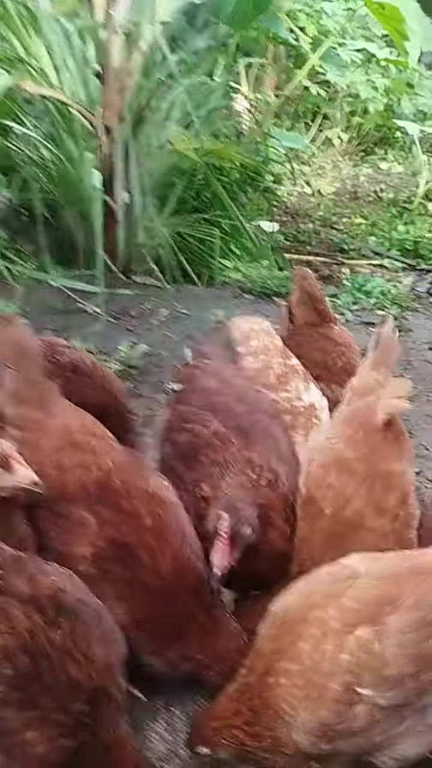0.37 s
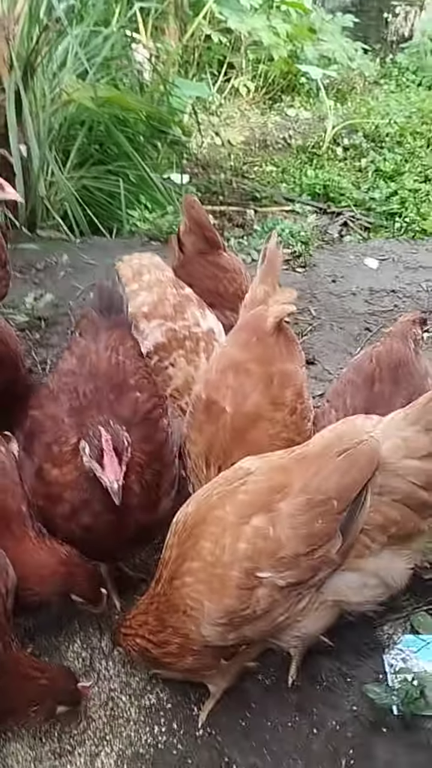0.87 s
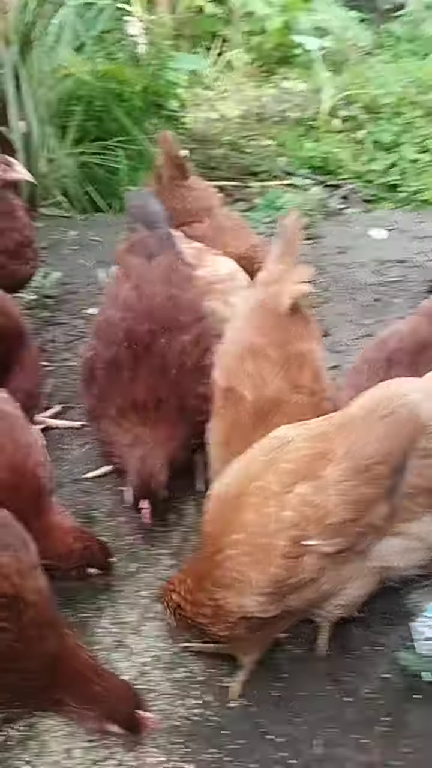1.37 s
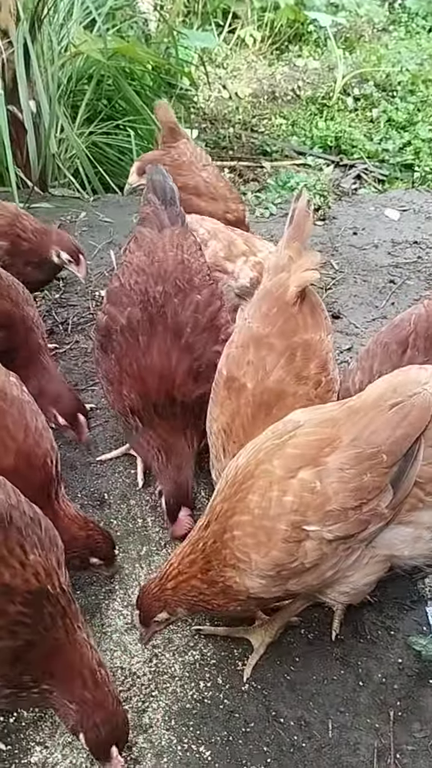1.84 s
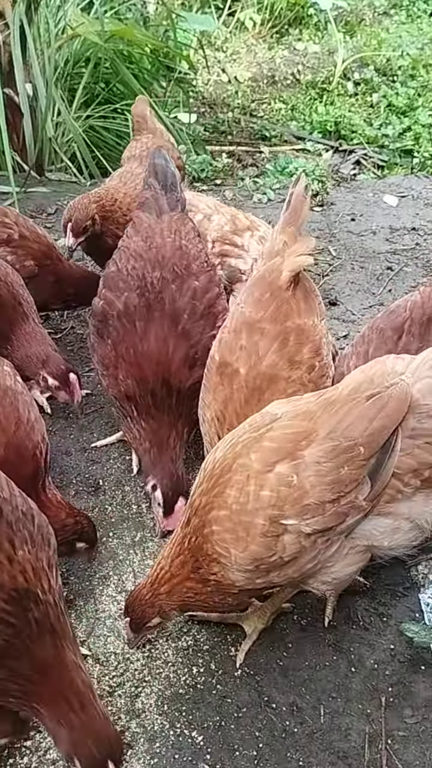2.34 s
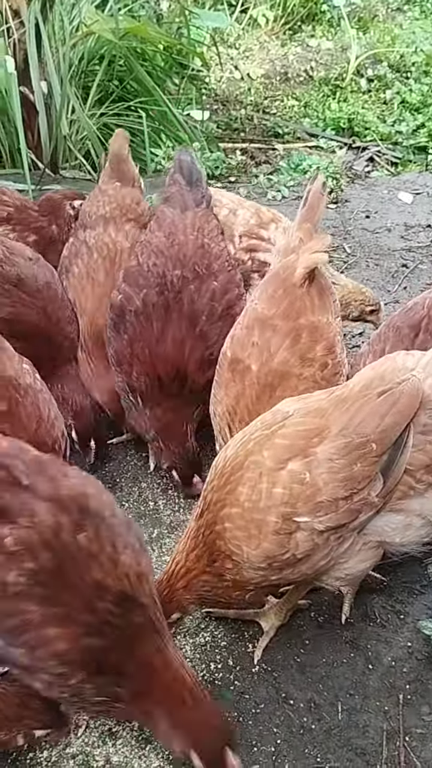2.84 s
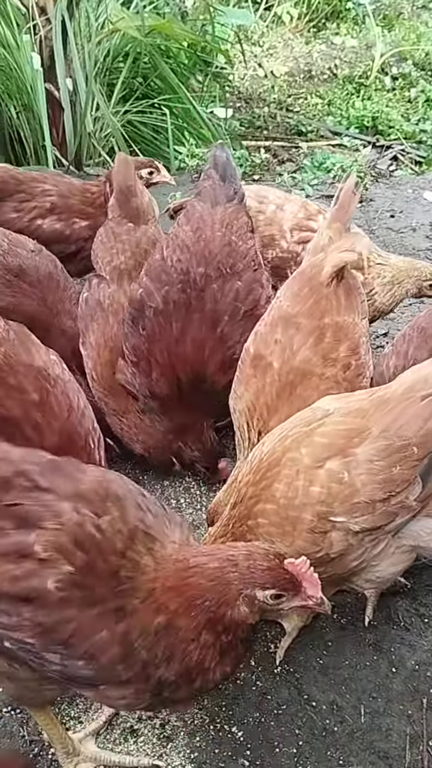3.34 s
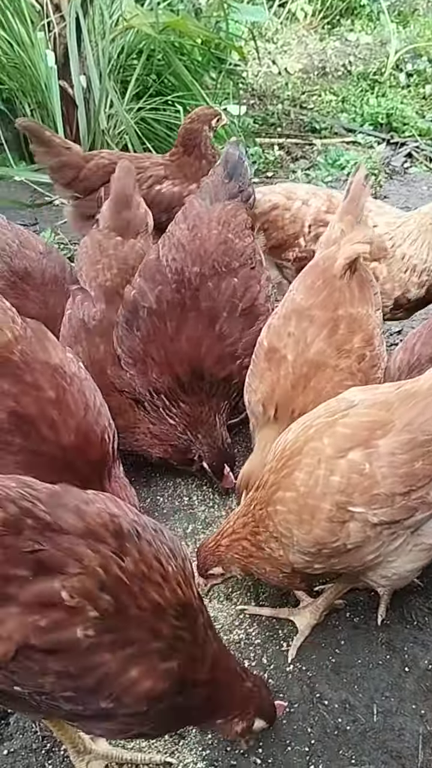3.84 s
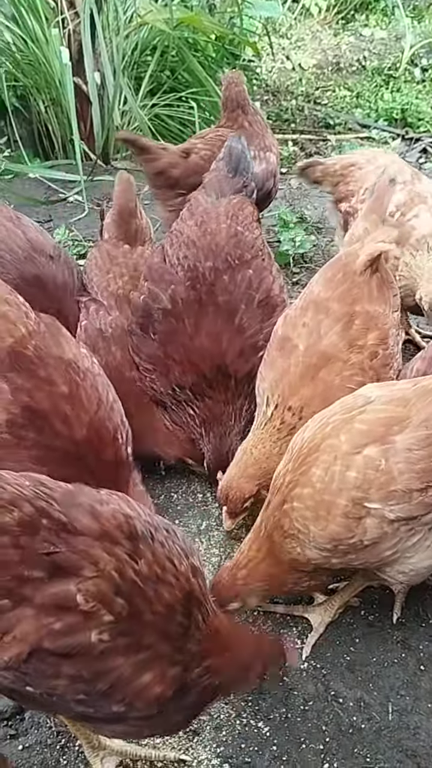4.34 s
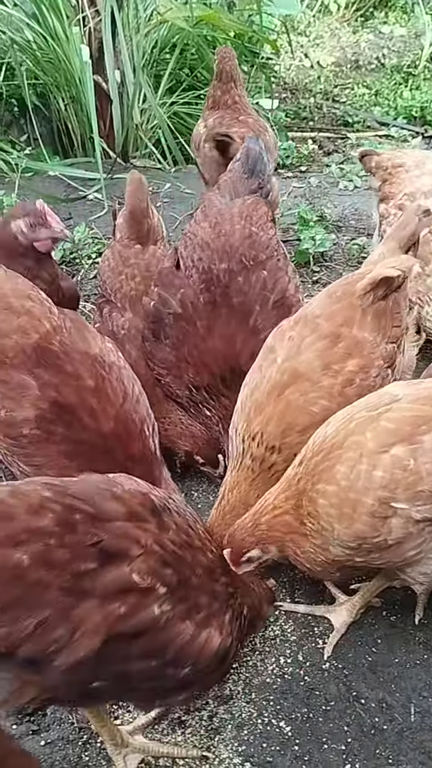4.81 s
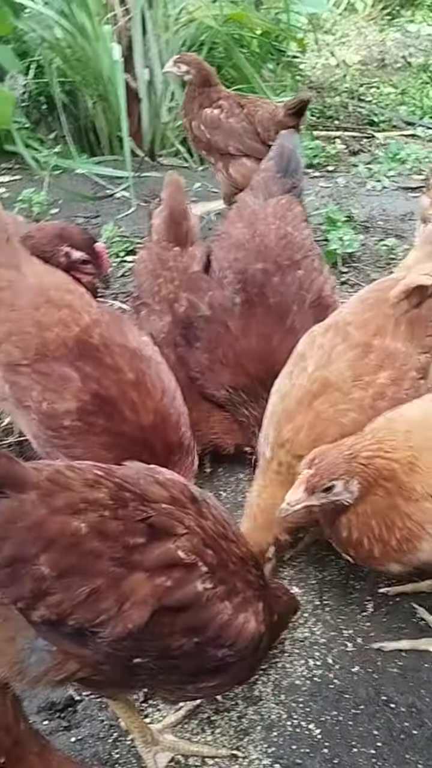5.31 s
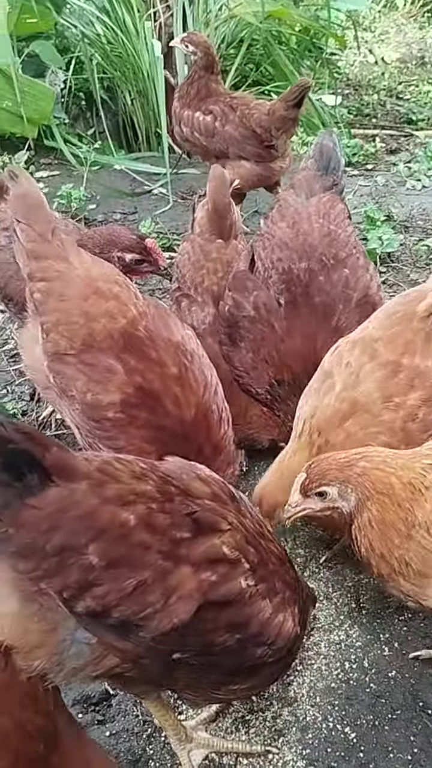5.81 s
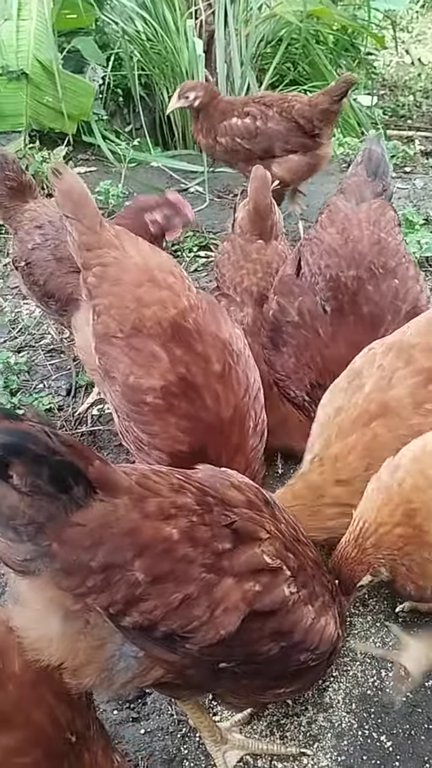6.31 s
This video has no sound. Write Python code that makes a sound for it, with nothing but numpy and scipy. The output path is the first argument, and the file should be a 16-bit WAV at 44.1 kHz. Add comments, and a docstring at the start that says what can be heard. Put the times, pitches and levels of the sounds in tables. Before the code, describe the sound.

Outdoors, quick high peeps gliding downwards and lower, rounder clucks come from several hens around a handheld stereo phone. They are sparse at first, then cluster densely in the middle and continue loosely to the end. Beaks tick and thud softly on the ground, and feet rasp through grain, most clearly near the end. Behind them lie a deep engine drone, soft yard noise, faint insects and a distant trilling bird.

```python
"""A yard, with young hens close by: they peep and cluck over scattered feed, scratching and pecking.
Far off a small bird trills and a hen calls; insects hiss and distant engines drone below.
Calls are gliding tones with overtones, scratches and pecks are filtered noise, the bird whistles sines,
the engines are wavering low tones and the yard is coloured noise. A handheld stereo phone listens."""
import sys
import numpy as np
from scipy import signal
from scipy.fft import rfft, irfft
from scipy.io import wavfile
from scipy.ndimage import map_coordinates

SR = 44100
rng = np.random.default_rng(int(sys.argv[2]) if len(sys.argv) > 2 else 0)


def wav_out(sig):
    """Save sig, one row per channel (or a flat mono array), as 16-bit PCM at SR to the path in sys.argv[1]."""
    wavfile.write(sys.argv[1], SR, np.round(np.clip(np.atleast_2d(sig).T, -1, 1) * 32767).astype(np.int16))


def boost(x):
    """Linear amplitude factor 10**(x/20) for a level x in decibels (scalar or array-like)."""
    u = np.asarray(x, float) / 20
    return 10 ** u


N = 294147   # length in samples


def rms_one(x):
    """Scale to rms 1."""
    return x / np.sqrt(np.mean(x ** 2) + 1e-20)


def drift(rate, count):
    """Slow noise of spread about 1 that changes about rate times a second."""
    knots = rng.standard_normal(int(count * rate / SR) + 3)
    return map_coordinates(knots, [np.arange(count) * rate / SR], order=3)


def band(x, hz, octaves):
    """Band-pass around hz."""
    edges = [hz * 2 ** (-octaves / 2), min(hz * 2 ** (octaves / 2), .45 * SR)]
    return signal.sosfilt(signal.butter(2, edges, "band", fs=SR, output="sos"), x)


def add(out, s, sound, pan_db):
    """Place a mono sound at time s, louder and a little earlier on one side (positive pan: left)."""
    for side, sign in enumerate([1, -1]):
        at = max(int(s * SR - 0.37 * sign * pan_db), 0)
        piece = sound[:N - at]
        out[side, at:at + len(piece)] += piece * boost(sign * pan_db / 2)


# Distant engine drones, one list per drone: t/s, f/Hz, level/dB (relative)
DRONE_TRACKS = [
    [(0., 65.2, -37.5), (1.4, 65.88, -32.5), (1.75, 68.5, -42), (2.2, 70.35, -43.5), (2.5, 75.47, -34),
     (2.9, 78, -40), (4.4, 73.3, -39.5), (6.3, 82, -41)],
    [(2., 111.5, -44.5), (2.7, 111.8, -39.5), (4.3, 108.7, -48)],
    [(3.9, 56.38, -42.5), (4.37, 57.92, -37), (5.2, 37.23, -42), (5.7, 53.06, -45.5), (6.67, 56.9, -35.5)],
]


def engines():
    """Distant engines: wavering low tones, each with a weak octave, that fade in and out with distance."""
    out, t = np.zeros(N), np.arange(N) / SR
    for rows in DRONE_TRACKS:
        s, hz, db = np.transpose(rows)
        wavering_hz = np.interp(t, s, hz) * (1 + 0.01028 * drift(7, N))
        phase = 2 * np.pi * np.cumsum(wavering_hz) / SR
        # fades of 0.55 s lie outside the first and last points
        fade = np.clip(np.minimum(t - s[0], s[-1] - t) / 0.55 + 1, 0, 1)
        level = boost(np.interp(t, s, db) + 4 + 1.67 * drift(8.2, N))
        out += fade * level * (np.sin(phase) + boost(-17.0) * np.sin(2 * phase))
    return out


YARD_DB = -40   # rms level of the whole background
# Spectrum of traffic, leaves and insects around the microphone: f/Hz, level/dB (per Hz, relative)
YARD_SPECTRUM = [(18, -26), (30, -2.5), (81, -5), (210, -16), (330, -18.5), (385, -26.5), (800, -32.5),
                 (1280, -39.5), (2410, -41), (3490, -47.5), (6300, -47.5), (6800, -44.5), (7800, -40.5),
                 (10300, -46), (12000, -56.5), (16000, -59.5)]
# Where the background sits between the channels: f/Hz, level/dB (left over right)
YARD_LEAN = [(100, -2.5), (4400, -3), (7200, 0)]


def yard(patchy_db=1.24):
    """Coloured noise, alike in both channels in the bass and unrelated in the treble, wavering by band."""
    hz = np.maximum(np.arange(N // 2 + 1) * SR / N, 1)
    points, lean = np.array(YARD_SPECTRUM), np.array(YARD_LEAN)
    colour = boost(np.interp(np.log(hz), np.log(points[:, 0]), points[:, 1]))
    alike = 1 / (1 + (hz / 560) ** 2.33)
    mid, side = rfft(rng.standard_normal((2, N))) * colour
    both = np.sqrt(1 + alike) * mid + np.sqrt(1 - alike) * side * [[1], [-1]]
    lean_db = np.interp(np.log(hz), np.log(lean[:, 0]), lean[:, 1])
    both = both * boost(lean_db * [[.5], [-.5]])
    octave = np.log2(hz / 30).astype(int)
    out = sum(irfft(both * (octave == k), N) * boost(patchy_db * drift(5, N)) for k in range(-1, 10))
    return boost(YARD_DB) * rms_one(out)


def cricket():
    """One insect: a very narrow band of noise, pulsed 33 times a second, that slowly swells and sinks."""
    t = np.arange(N) / SR
    pulses = np.maximum(np.sin(2 * np.pi * 33 * t), 0) ** 2
    line = rms_one(band(rng.standard_normal((2, N)), 6855, 0.019))
    return boost(-72.0 + 2.0 * drift(1.6, N)) * pulses * line


# Trills of a small bird far off, onset of the first whistle: t/s
TRILL_STARTS = [.75, 0.999, 1.229, 1.46, 3.31, 3.53, 3.779, 4, 4.709, 4.949]


def far_bird():
    """Five quick falling whistles a trill, blurred by leaves on the way."""
    out, t = np.zeros((2, N)), np.arange(int(0.0239 * SR)) / SR
    for s in TRILL_STARTS:
        for k in range(5):
            hz = np.linspace(5650, 4350, len(t)) * rng.normal(1, .04)
            whistle = np.hanning(len(t)) * np.sin(2 * np.pi * np.cumsum(hz) / SR)
            add(out, s + 0.034 * k, boost(rng.normal(-59.5, 0.86)) * whistle, 5.)
    tail = np.arange(SR // 8) / SR
    blur = rng.standard_normal((2, len(tail))) * boost(-27 - 60 * tail / 0.2)
    return boost(-9) * out + signal.fftconvolve(out, blur, axes=1)[:, :N]


# Calls of a hen far off: start t/s, length t/s, level/dB (relative)
FAR_HEN_CALLS = [(0., 0.23, -58), (0.333, 0.28, -63), (1.839, 0.21, -60.5)]


def far_hen():
    """A drawn-out croak: three wavering partials, over a rasp."""
    out = np.zeros((2, N))
    for s, length, db in FAR_HEN_CALLS:
        count = int(length * SR)
        phase = 2 * np.pi * np.cumsum(597 * (1 + .035 * drift(90, count))) / SR
        tone = sum(boost(level_db + 4.9 * drift(37, count)) * np.sin(k * phase)
                   for k, level_db in enumerate([0., -6., 1.], 1))
        rasp = rms_one(band(rng.standard_normal(count), 1200, 1.3))
        tone = tone * (1 + .5 * drift(250, count)) + rasp
        add(out, s, boost(db) * np.hanning(count) ** .5 * tone, 0)
    return out


# Feet scratching through feed: middle t/s, half-length t/s, centre f/Hz, level/dB (at the swell's top)
FOOT_STROKES = [(0.749, 0.049, 5350, -55), (1.365, 0.32, 6500, -65.5), (1.794, 0.15, 6700, -61.5),
                (2.055, 0.052, 6520, -65.5), (2.099, 0.048, 4900, -61), (2.26, 0.12, 6730, -64.5),
                (3.176, 0.08, 5530, -51.5), (5.991, 0.049, 5800, -43.5), (6.24, 0.058, 5134, -57),
                (6.515, 0.2, 5770, -58)]


def scratches():
    """Dense grain clicks under a swelling stroke, with a faint high rasp."""
    out = np.zeros((2, N))
    for s, half_length, hz, db in FOOT_STROKES:
        count = int(2 * half_length * SR)
        grains = rng.standard_normal(count) * boost(3.0 * np.minimum(rng.exponential(1, count), 4))
        body = rms_one(band(band(grains, hz, .5), hz, .5))
        rasp = boost(-18) * rms_one(band(grains, 13500, .4))
        stroke = np.hanning(count) ** 2.86 * boost(1.35 * drift(61.4, count))
        add(out, s - half_length, boost(db) * stroke * (body + rasp), -9.)
    return out


# Beaks on the ground: t/s, peak level/dB (before panning), centre f/Hz
BEAK_TAPS = [(.9, -45, 2500), (2.095, -55, 4000), (1.518, -45, 846), (2.704, -47, 2473),
             (3.79, -45.5, 1280), (4.279, -41.5, 496.4), (5.558, -49, 1314), (5.86, -41, 497)]


def pecks(per_s=7., crowd_db=-60.):
    """A beak tap is a short decaying click of noise; fainter ones fall at random all over the feed."""
    out = np.zeros((2, N))
    faint = [(a * N / SR, crowd_db + 8 * b, 1500 * 8 ** c)
             for a, b, c in rng.random((int(per_s * N / SR), 3))]
    for s, db, hz in list(BEAK_TAPS) + faint:
        burst = rng.standard_normal(400) * np.exp(-np.arange(400) / SR / 0.032)
        tap = band(burst, hz, 0.91)
        add(out, s, boost(db) * tap / np.abs(tap).max(), rng.normal(0, 1.7))
    return out


REST_HZ, HOARSE = 2100., .26   # resting pitch of the syrinx; strength of rasp in the voice
HOOK_S, HOOK_DB = .008, -7   # a high call leaves the resting pitch in this time; onsets are this much fainter
FLICK_S, FLICK_HZ, FLICK_DB = .01, 3000, -18   # a low cluck flicks towards this pitch as it fades
THROAT_GAP_HZ, THROAT_GAP_DB = 4200, -9   # the windpipe passes overtones near here poorly
EDGE_S = .004   # the tone starts a little before and dies a little after


def syrinx(hz, phase, db):
    """Five harmonics, thinner on high notes and weakened by the windpipe, plus a two-thirds subtone."""
    octaves_up = np.log2(np.maximum(hz / 1200, 1))
    step_db = -12 - 7 * octaves_up + rng.normal(0, 2)
    tone = 0
    for k in range(1, 6):
        gap_db = (k > 1) * THROAT_GAP_DB / (1 + ((k * hz - THROAT_GAP_HZ) / 800.) ** 4)
        level = boost(step_db * (k - 1) ** .8 + gap_db)
        tone = tone + level * np.sin(k * phase) * (k * hz < .45 * SR)
    # low calls partly lock on two-thirds of the pitch
    return boost(db) * (tone + boost(-20.5 - 19.0 * octaves_up) * np.sin(phase * 2 / 3))


def hen_call(call, calls):
    """One call: the membranes scoop out of their resting pitch, glide, and may flick up at the end."""
    s, length, first_hz, middle_hz, last_hz, db, flicks = call
    high = first_hz > REST_HZ
    glide_count = int((length + 2 * EDGE_S) * SR)
    u = np.append(np.linspace(-1, 1, glide_count), np.ones(int(flicks * FLICK_S * SR)))
    count = len(u)
    t = np.arange(count) / SR
    flick = flicks * np.clip((t - length - EDGE_S) / FLICK_S, 0, 1)
    hz = middle_hz + (last_hz - first_hz) / 2 * u + ((first_hz + last_hz) / 2 - middle_hz) * u ** 2
    hook = np.exp(-(t / (HOOK_S if high else .003)) ** 2)
    # a note that carries on another needs no scoop
    hook *= not any(abs(c[0] + c[1] - s) < .01 and abs(c[4] / first_hz - 1) < .2 for c in calls)
    scoop = .8 if high and last_hz < middle_hz else .25
    hz += scoop * (REST_HZ - first_hz) * hook + (FLICK_HZ - last_hz) * flick
    wavering_hz = hz * (1 + (.014 + .05 * flick) * drift(200, count))
    phase = 2 * np.pi * np.cumsum(wavering_hz) / SR
    tone = syrinx(hz, phase, db)
    unsteady_db = (2 + max(-38 - db, 0) / 12) * drift(90, count)   # faint calls waver most
    swell = boost(-6 * u ** 2 + HOOK_DB * hook + FLICK_DB * flick ** .5 + unsteady_db)
    swell *= np.tanh(t / .002) * np.tanh((t[-1] - t) / .004)
    # turbulent air shakes the tone, high and distant calls most
    flutter = middle_hz / 24000 * drift(600, count)
    rasp = HOARSE * (middle_hz / 4000) * boost((-40 - db) / 2) * drift(900, count)
    return swell * (1 + flutter + rasp) * tone


HENS_PAN_DB, FAR_HENS_DB = -3., -67   # mean left over right; lowest level of the hens further off
SLIDE_DONE_AT_HALF = .6   # share of a slide covered by its middle
DIP_END_LIFT = 0.144   # a dip starts lower and ends higher by this share of its depth
# Peeps that slide one way: start t/s, length t/s, first f/Hz, last f/Hz, level/dB (nominal, mid-call)
PEEPS = [(.08, 0.049, 1790, 2100, -47.5), (.108, 0.068, 3520, 2490, -54.5), (.33, 0.15, 4080, 2575, -57),
         (.478, 0.019, 2270, 2034, -38.5), (.55, 0.088, 3460, 3240, -55), (.628, 0.053, 2190, 2380, -48),
         (.656, 0.019, 1107, 745, -31.5), (.735, 0.062, 3020, 2500, -52.5), (.85, .038, 3350, 2340, -42),
         (.888, .01, 2450, 4000, -48), (1.14, 0.038, 2570, 2210, -43.5), (1.177, 0.066, 3910, 2760, -53),
         (1.53, 0.041, 1960, 2040, -44.5), (1.503, 0.021, 2060, 1560, -44),
         (1.565, 0.074, 2600, 2216, -47.5), (1.76, 0.049, 2590, 2150, -52),
         (1.92, 0.049, 3270, 2050, -60.5), (2.454, 0.022, 2850, 2700, -44),
         (2.477, 0.017, 2320, 2240, -44.5), (2.81, 0.065, 3000, 2940, -60.5),
         (2.89, 0.059, 3260, 2340, -48.5), (3.014, 0.05, 2950, 2800, -49), (3.02, 0.015, 2170, 2080, -37),
         (3.057, 0.022, 2600, 2170, -41.5), (3.078, 0.2087, 3005, 2840, -53.5),
         (3.148, 0.051, 2950, 2640, -48), (3.313, 0.053, 3710, 2440, -44.5), (3.39, 0.044, 2550, 2220, -63),
         (3.51, 0.066, 3290, 2610, -42), (3.556, 0.05, 2670, 2484, -47), (3.617, 0.041, 2500, 2137, -52.5),
         (3.705, 0.051, 3600, 3200, -59.5), (3.743, 0.031, 2130, 1970, -58), (4.045, .035, 2300, 2026, -58),
         (4.18, 0.086, 2630, 2100, -52.5), (3.796, 0.12, 2590, 2100, -55.5),
         (3.963, 0.031, 1069, 1186, -50), (4.1, 0.027, 2650, 3048, -52.5), (4.111, 0.016, 2100, 1710, -44),
         (4.295, 0.054, 3040, 2700, -48), (4.335, 0.043, 2837, 2310, -52), (4.398, 0.028, 3870, 3780, -59),
         (4.7, 0.057, 3770, 2680, -48.5), (4.792, 0.0823, 3320, 2520, -54), (4.854, 0.095, 4950, 2760, -47),
         (4.905, .06, 3300, 3040, -44), (4.965, 0.021, 4300, 3010, -47.5), (5.135, 0.045, 3890, 3950, -50),
         (5.178, 0.064, 4160, 2705, -47), (5.567, 0.043, 3340, 2290, -48), (5.774, 0.1, 3412, 2690, -58.5),
         (5.96, 0.02, 2820, 2200, -50), (6.115, 0.097, 2980, 2950, -52), (6.09, 0.095, 2594, 2230, -56.5),
         (6.245, 0.061, 2600, 2340, -58.5), (6.42, 0.077, 4100, 3410, -53), (6.5, 0.081, 3490, 2340, -54)]
# Clucks that dip and come back (a negative dip is an arch):
# start t/s, length t/s, middle f/Hz, dip f/Hz, level/dB (nominal, mid-call)
CLUCKS = [(0.098, 0.017, 1330, 10, -35), (0.491, 0.025, 1728, 29, -44), (1.166, 0.032, 1428, 70, -32.5),
          (2.221, 0.0545, 2027, 340, -51), (2.385, 0.044, 1683, 146, -45.5),
          (2.519, 0.031, 2110, -130, -49.5), (2.551, 0.016, 1191, 84, -28), (2.632, 0.066, 2420, 261, -50),
          (2.646, 0.033, 1917, 165, -41), (2.705, 0.05, 2320, 262, -41), (2.962, 0.042, 2030, 62, -42),
          (3.035, 0.021, 1736, 60, -34), (3.202, 0.02, 2800, -110, -43), (3.21, 0.028, 3600, -680, -46),
          (3.371, 0.014, 3180, -300, -48), (3.975, 0.046, 1637, 42, -52), (4.129, 0.017, 1371, 100, -29.5),
          (4.322, 0.04, 1688, 217, -41.5), (4.567, 0.05, 1785, 234, -44), (4.712, 0.078, 2450, 361, -47.5),
          (5.08, 0.074, 2268, 251, -51.5), (5.998, 0.014, 1344, 32, -37.5),
          (6.192, 0.056, 2415, -250, -48.5)]


def hens():
    """Each call is a gliding syrinx tone, richer when low; hens further off fill in faintly."""
    out = np.zeros((2, N))
    far = [(a * N / SR, 0.046 + 0.047 * b, 2500 + 1100 * c, 2100 + 700 * c, FAR_HENS_DB + 5 * d)
           for a, b, c, d in rng.random((25, 4))]
    calls = []   # start s, length s, first, middle and last Hz, dB, whether it flicks
    for s, length, first, last, db in list(PEEPS) + far:
        middle = first + SLIDE_DONE_AT_HALF * (last - first)
        calls.append((s, length, first, middle, last, db, False))
    for s, length, hz, dip, db in CLUCKS:
        first, last = hz + dip * (1 - DIP_END_LIFT), hz + dip * (1 + DIP_END_LIFT)
        calls.append((s, length, first, hz, last, db, hz < REST_HZ))
    for call in calls:
        add(out, call[0] - EDGE_S, hen_call(call, calls), rng.normal(HENS_PAN_DB, 4.2))
    return out


# Reflections off ground, bodies and bushes: delay t/s (shortest), level/dB
REFLECTIONS = [(.006, -17), (.014, -24)]


def echoes(x):
    """A few short echoes, each from the other side, and a brief diffuse wash."""
    out = x.copy()
    for s, db in REFLECTIONS:
        for side in range(2):
            lag = int(s * rng.uniform(1.0, 1.15) * SR)
            out[side, lag:] += boost(db) * x[1 - side, :-lag]
    t = np.arange(SR // 4) / SR
    wash = rng.standard_normal((2, len(t))) * boost(-60 * t / .12)
    return out + boost(-36.5) * signal.fftconvolve(x, wash, axes=1)[:, :N]


def scene():
    """Animals with their echoes in the yard, over the steady background."""
    background = engines() + yard() + cricket()
    animals = far_bird() + far_hen() + scratches() + pecks() + hens()
    return background + echoes(animals)


def low_pass(x):
    """Removes everything above the highest recorded frequency."""
    return signal.sosfilt(signal.butter(12, 16640, fs=SR, output="sos"), x)


def record(dry):
    """The phone's microphone ports cancel a band near 9 kHz, and the top is cut above 15.75 kHz."""
    ports = signal.butter(2, [8350, 9600], "bandstop", fs=SR, output="sos")
    top_cut = signal.ellip(10, 1, 70, 15750, fs=SR, output="sos")
    mix = signal.sosfilt(top_cut, signal.sosfilt(ports, dry))
    return low_pass(mix)


dry = scene()
out = record(dry)
wav_out(out)
```